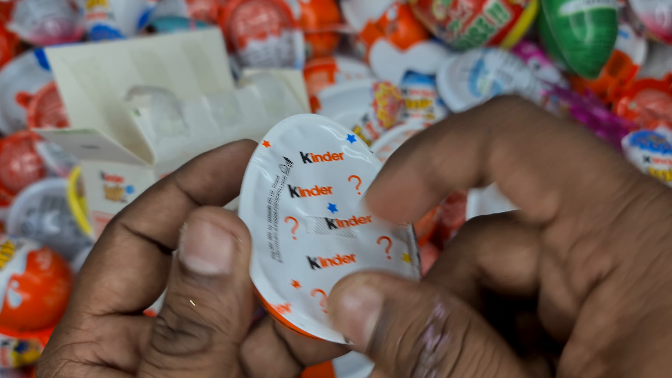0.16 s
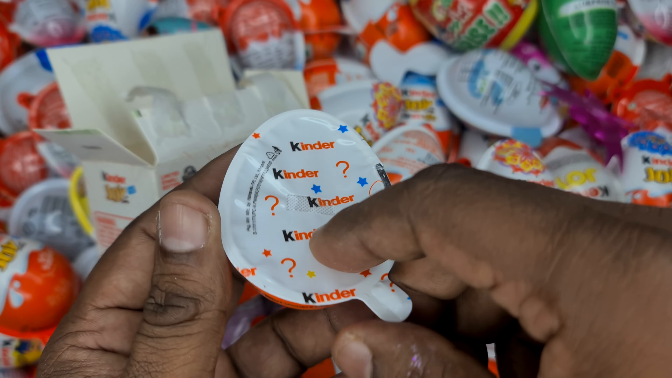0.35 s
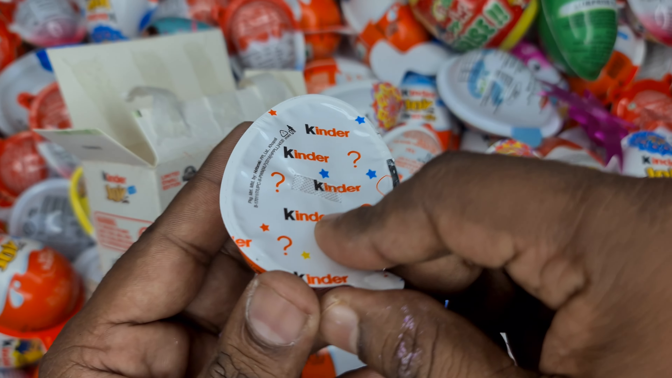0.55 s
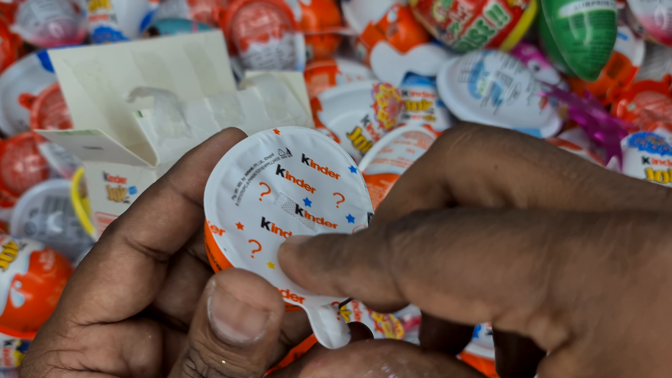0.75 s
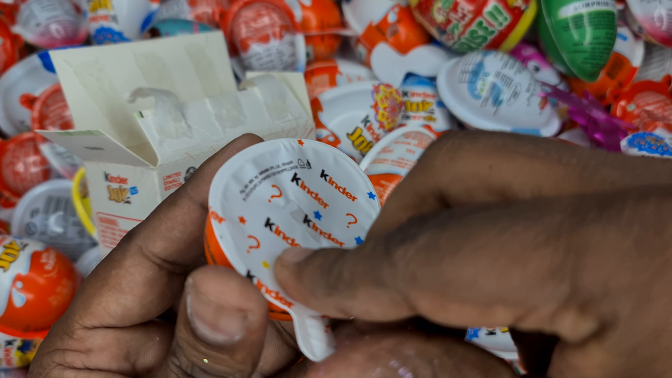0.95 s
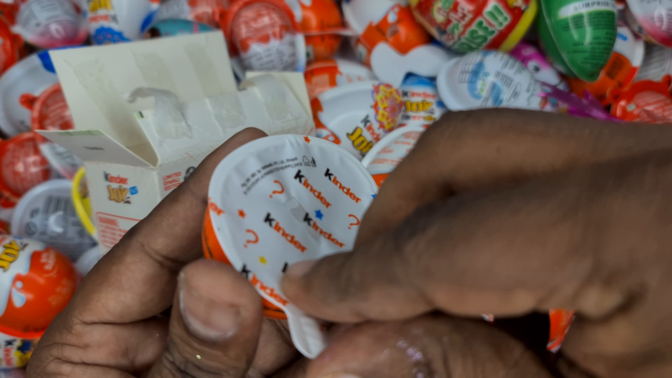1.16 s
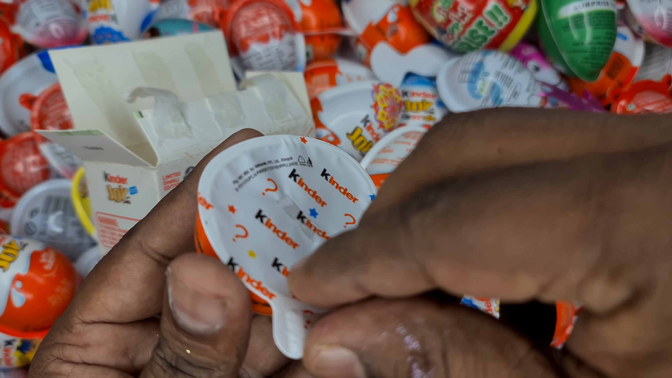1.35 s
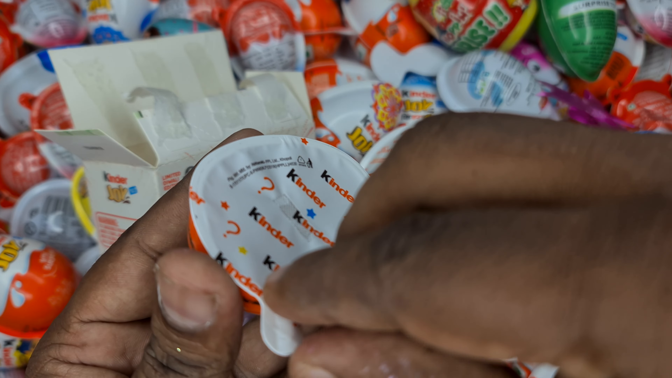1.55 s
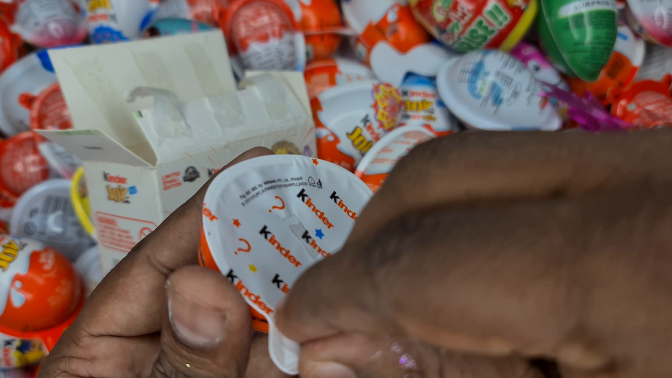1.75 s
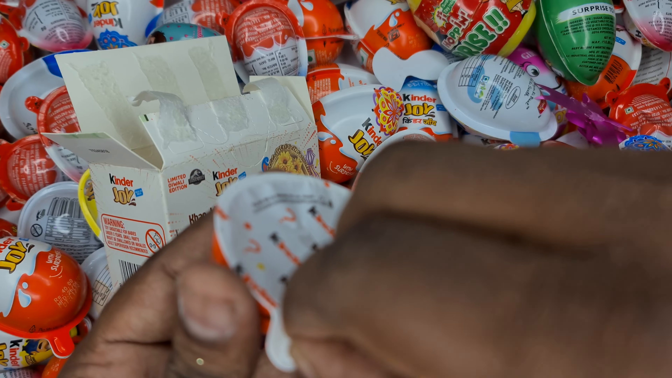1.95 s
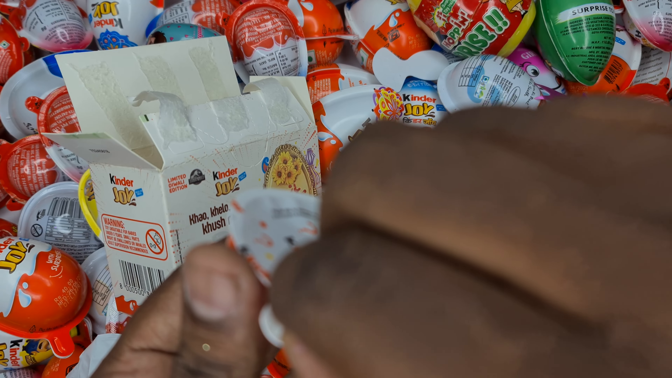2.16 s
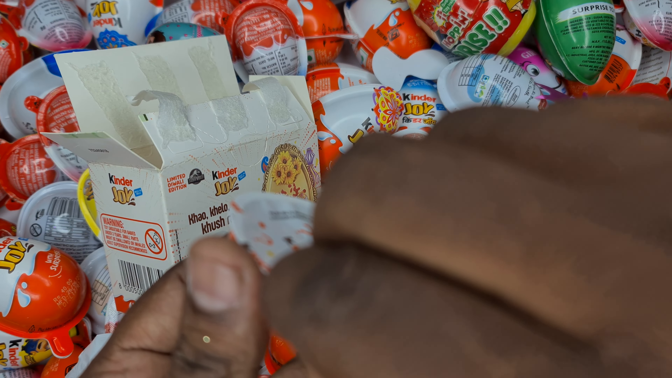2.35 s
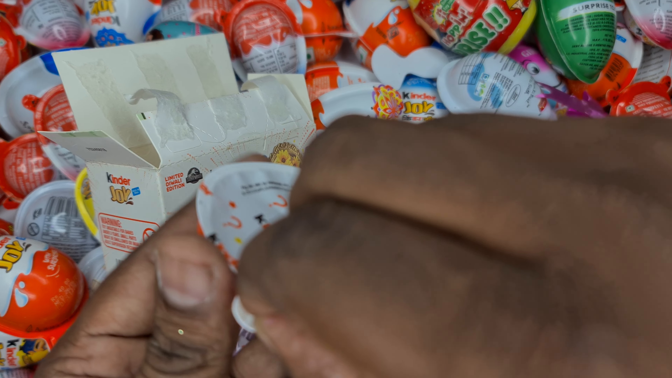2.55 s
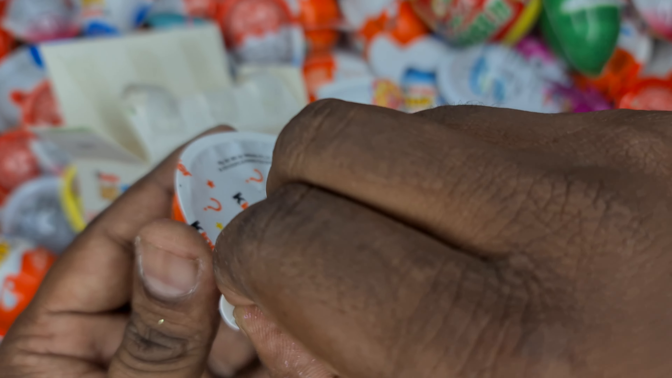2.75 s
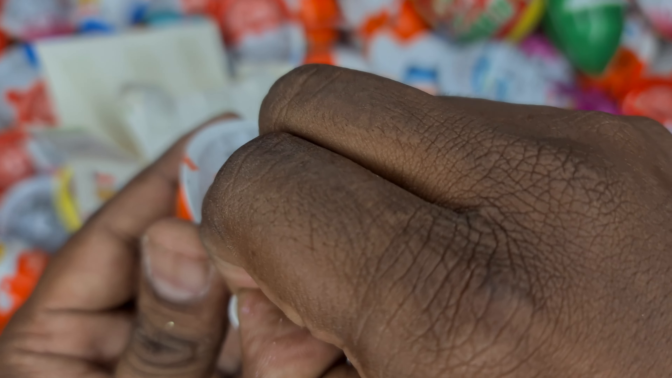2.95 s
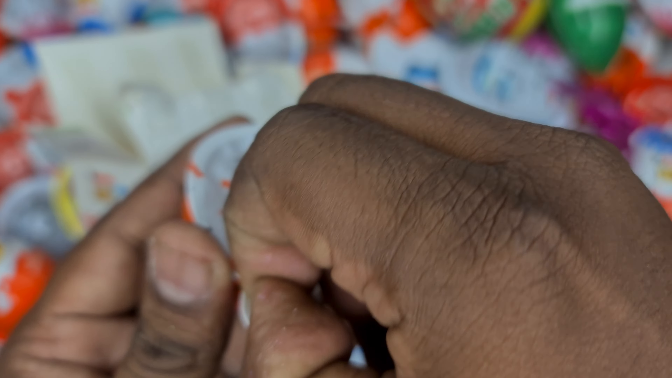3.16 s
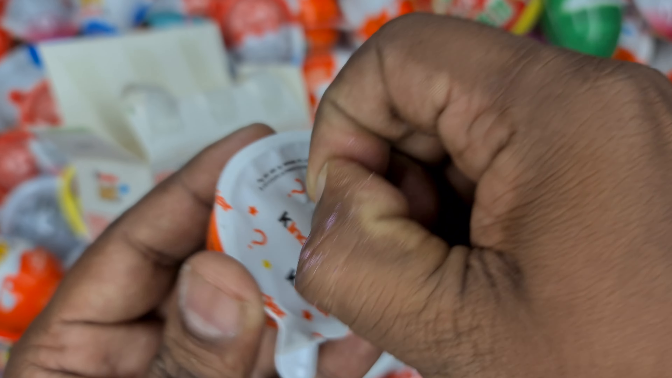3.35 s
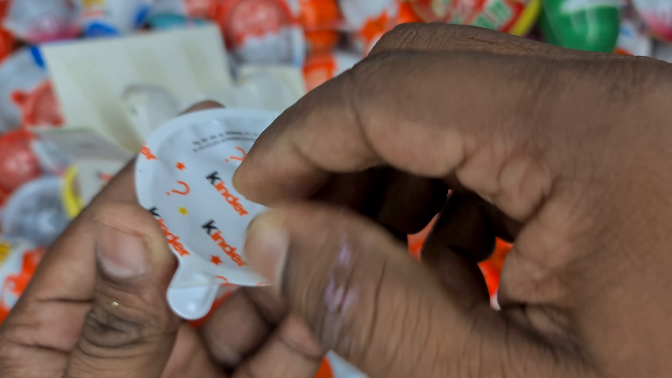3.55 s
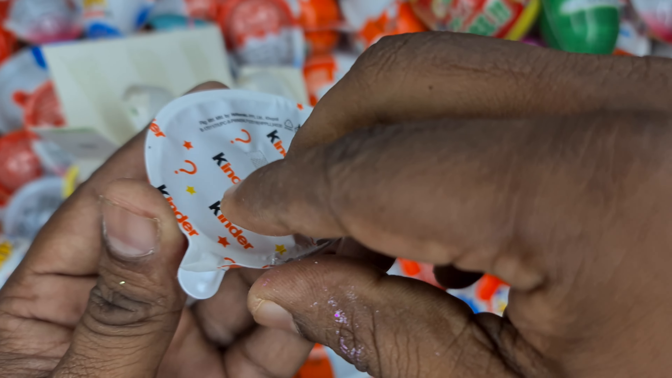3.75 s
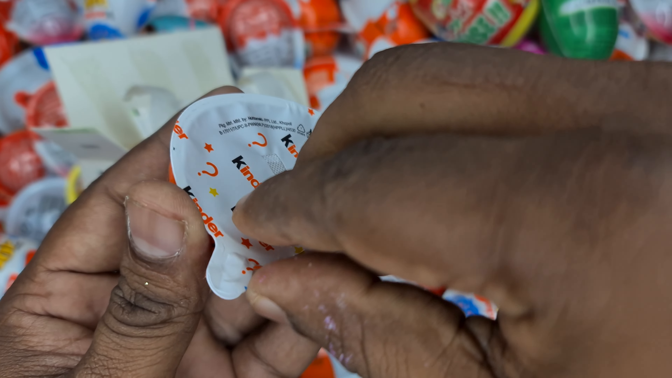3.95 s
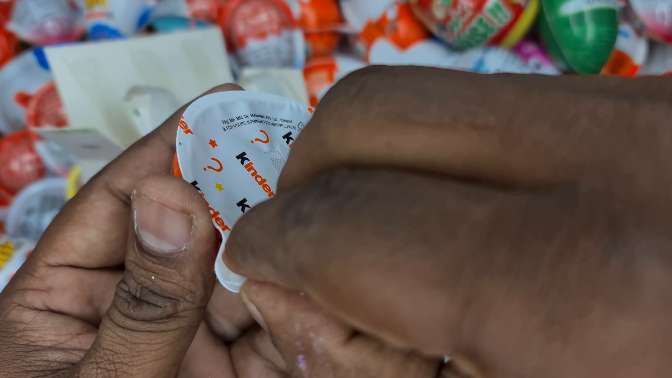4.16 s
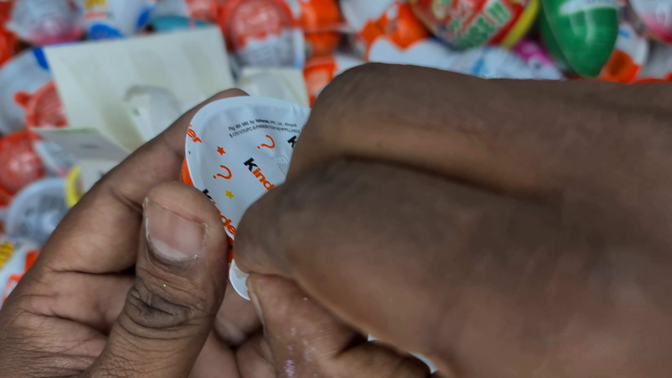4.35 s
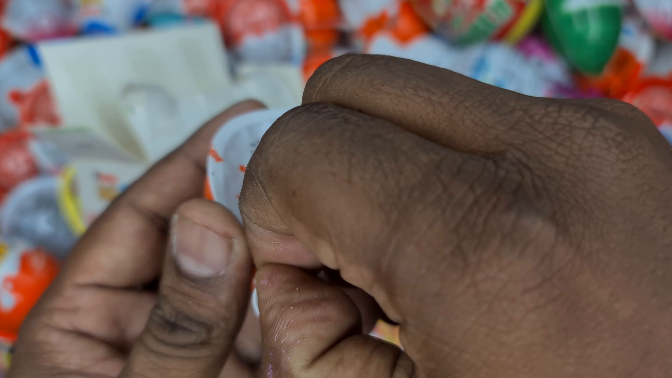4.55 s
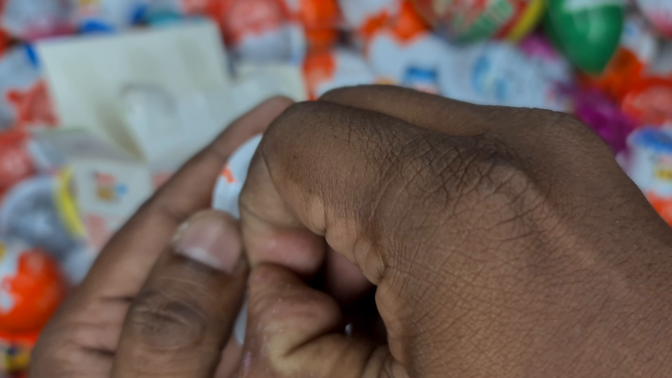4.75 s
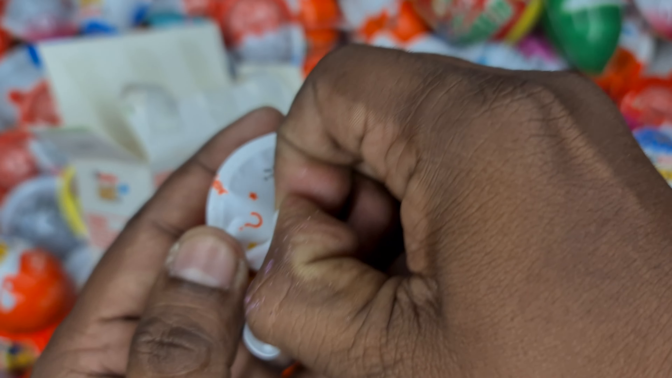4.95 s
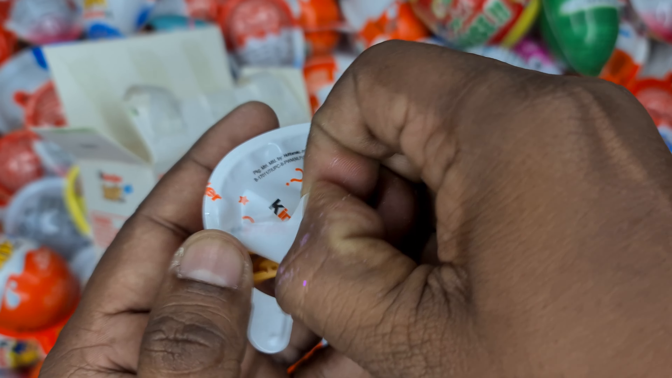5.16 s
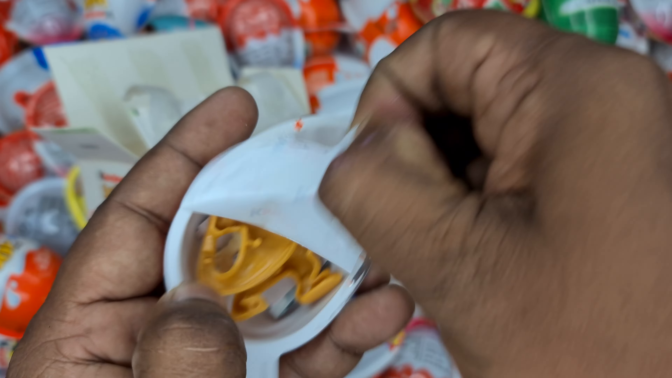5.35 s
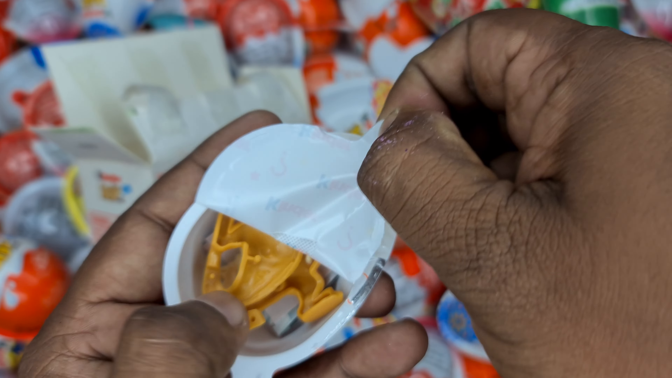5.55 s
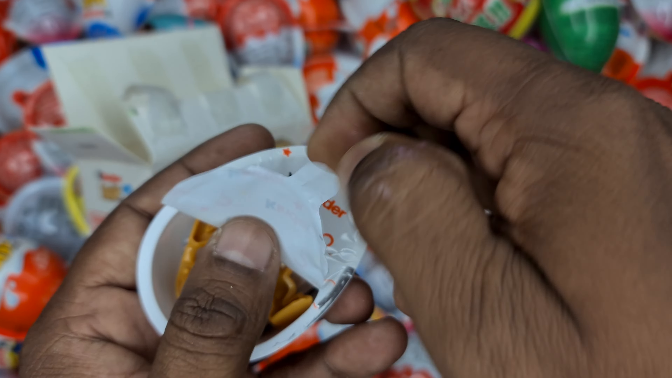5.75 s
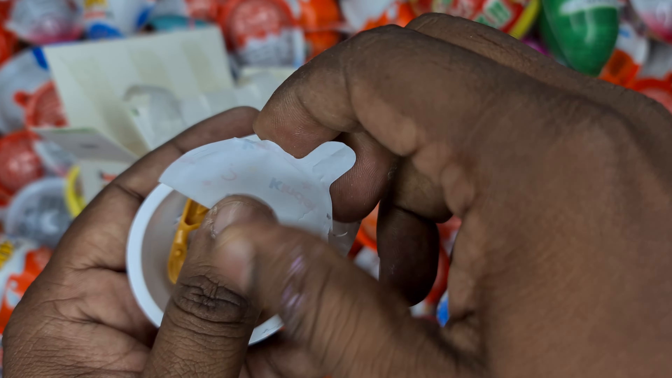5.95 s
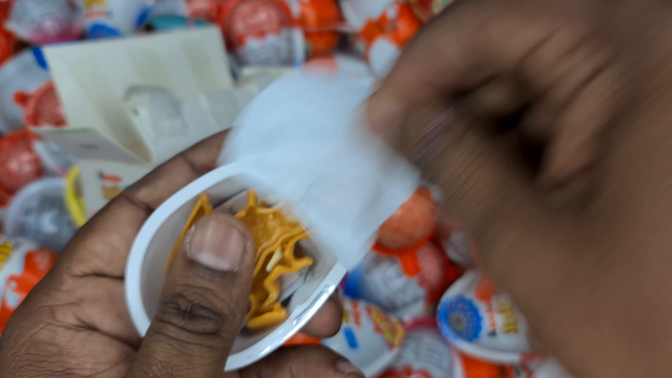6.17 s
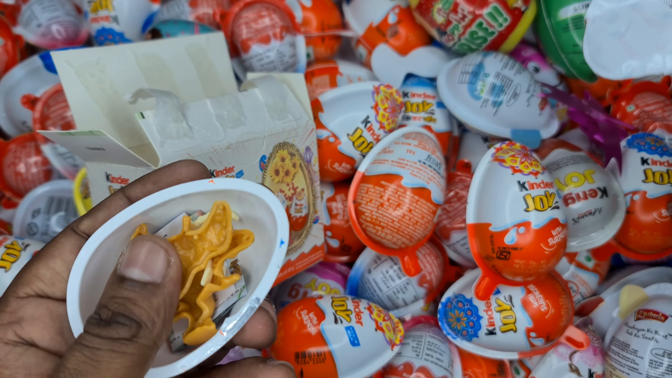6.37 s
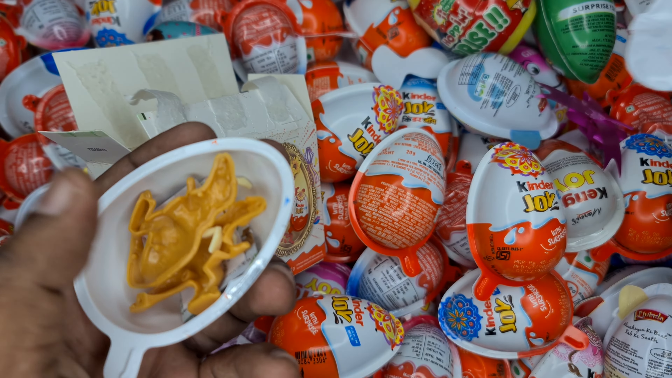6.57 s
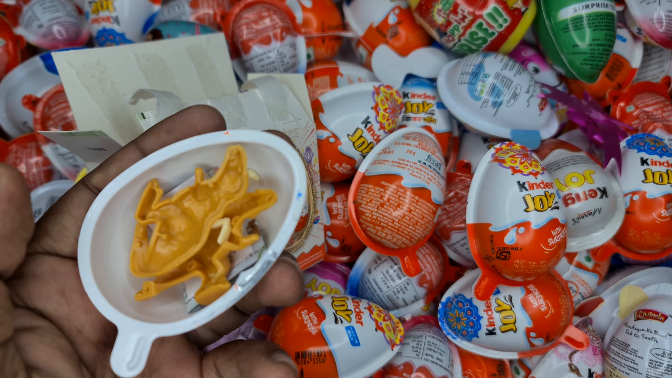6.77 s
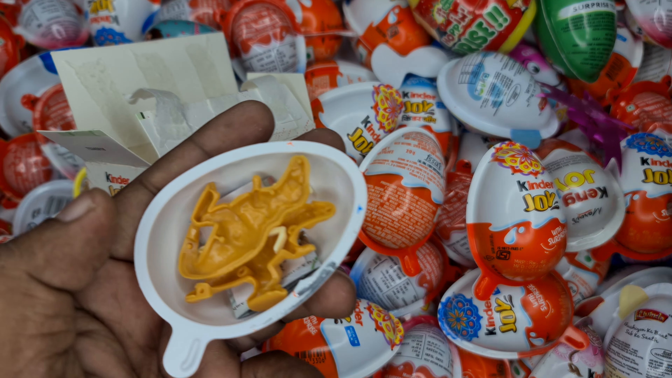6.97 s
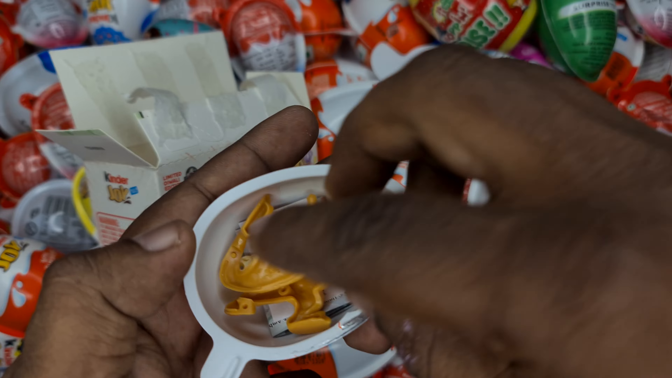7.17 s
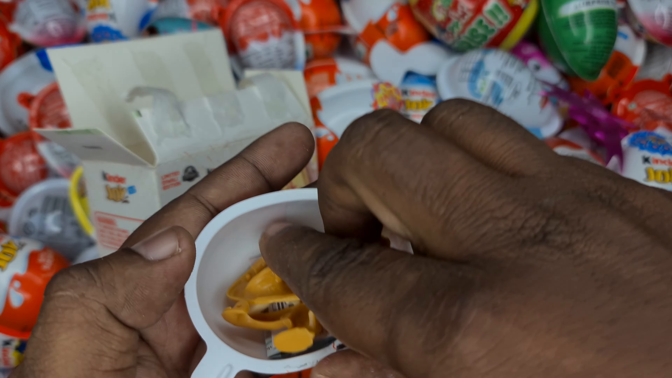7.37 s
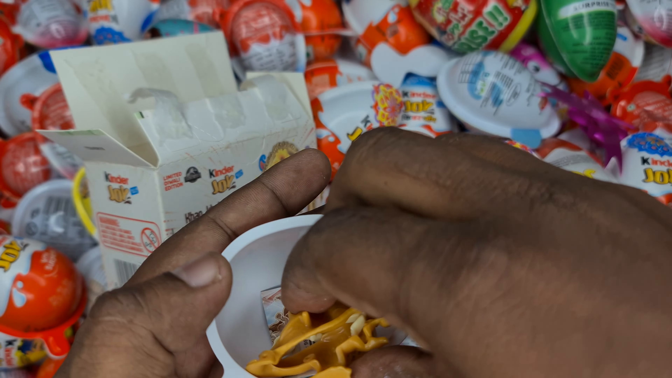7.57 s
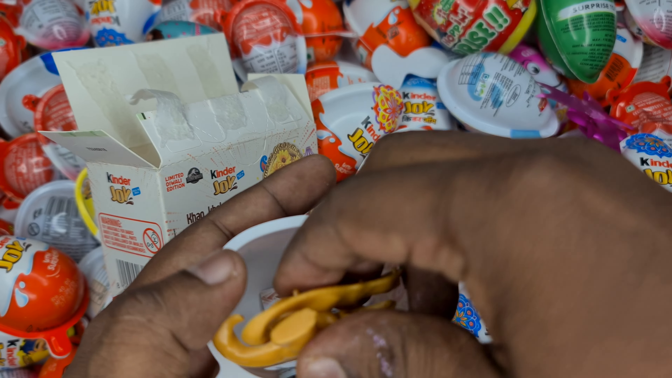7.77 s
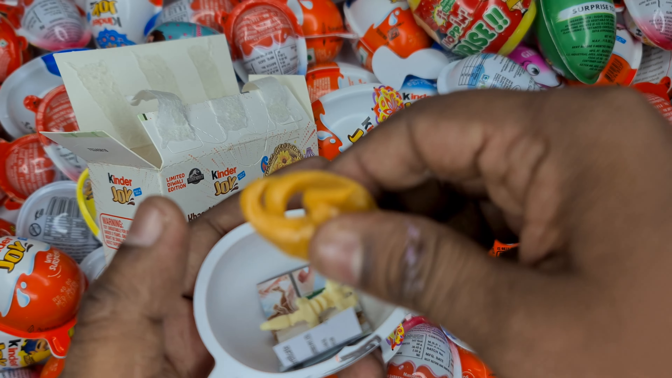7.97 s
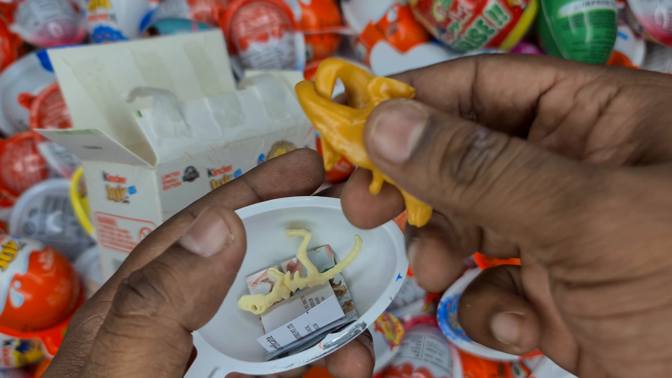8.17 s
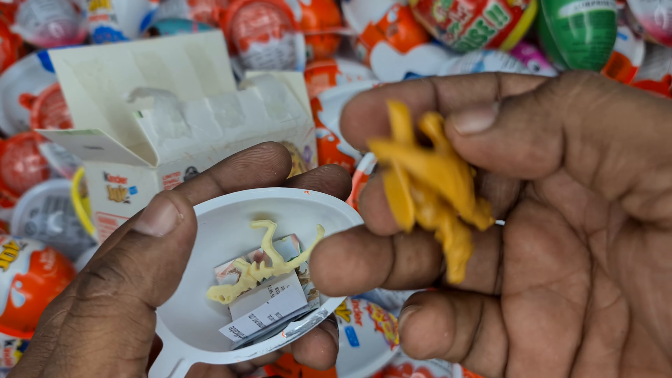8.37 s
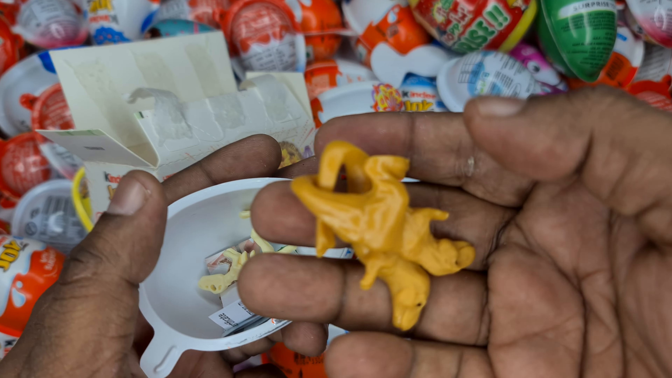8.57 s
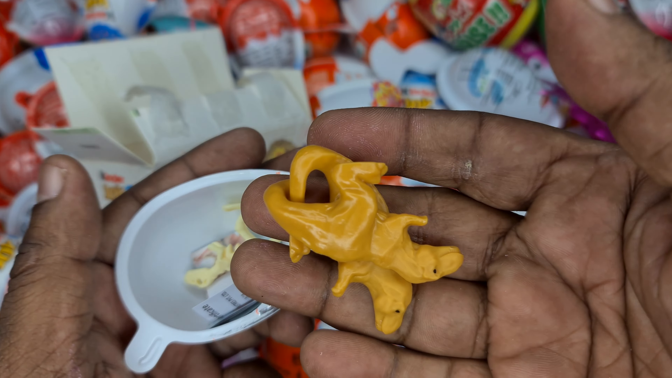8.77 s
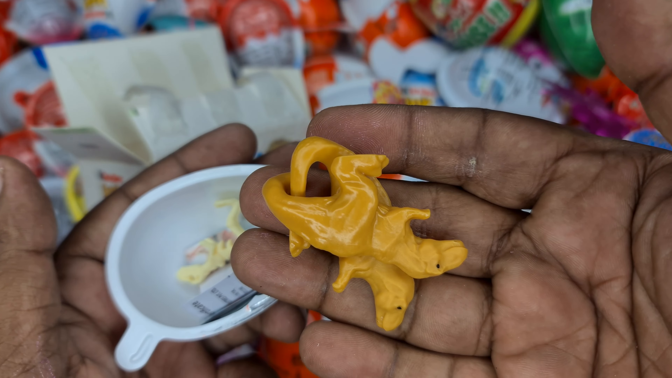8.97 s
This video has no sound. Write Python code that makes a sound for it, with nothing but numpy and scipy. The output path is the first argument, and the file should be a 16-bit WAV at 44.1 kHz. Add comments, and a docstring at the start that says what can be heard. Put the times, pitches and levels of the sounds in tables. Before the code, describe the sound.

A small, quiet room with soft air noise and a low, slowly wavering hum, heard close through two spaced microphones. At 0.05 to 0.25 s a few hollow foil pops sound as fingers press the capsule lid, then faint rustles and ticks, with isolated pops near 1.15, 2.3 and 2.6 s. A strong drum-like pop comes at 3.0 s, and a crackling cluster at 3.3 s. Around 4.0 and 4.45 s there are barely audible skin squeaks. From 4.75 s the seal begins to tear: bright snaps until 5.25 s, then a dense loud burst at 5.35 to 5.45 s. Lighter crackles follow to 5.8 s. The final rip at 6.15 to 6.27 s is sharp, with a dull knock and brief reverberation. Afterwards it is mostly quiet; from 7.2 to 8.2 s a plastic toy rustles and clicks softly against the shell, then hum remains until about 9 s.

```python
"""A small room with a low hum: fingers press and pick at the foil seal of a small plastic capsule,
peel it off in jerks and lift a plastic toy out. Each foil buckle pops at the pitch of the drum it forms
with the shell, rings the foil's modes and cracks in the treble; skin rustles and squeaks as shaped noise.
The room answers with decaying noise; two spaced microphones."""
import sys
import numpy as np
from scipy import signal
from scipy.fft import rfft, irfft, next_fast_len
from scipy.io import wavfile

SR = 44100
rng = np.random.default_rng(int(sys.argv[2]) if len(sys.argv) > 2 else 0)


def master(y):
    """Save y as 16-bit WAV."""
    cut = np.clip(np.atleast_2d(y).T, -1, 1)
    pcm = np.round(cut * 32767)  # scale
    wavfile.write(sys.argv[1], SR, pcm.astype(np.int16))


def natural_amplitude(level_db):
    """Convert a level in decibels to a linear amplitude factor, elementwise."""
    exponent = np.asarray(level_db, float) / 20
    return 10 ** exponent


N = 397782
RIGHT_LAG_S = 0.00022   # the foil edge is nearer the left microphone


def rms_one(x):
    """Scales to rms 1 over all channels."""
    return x / np.sqrt(np.mean(x ** 2) + 1e-20)


def at_hz(points, hz):
    """Reads a (hz, value) curve on a log frequency axis."""
    point_hz, value = np.array(points).T
    return np.interp(np.log(np.maximum(hz, 1)), np.log(point_hz), value)


def coloured(x, spectrum):
    """Filters noise by a curve in dB over Hz."""
    size = next_fast_len(x.shape[-1])
    hz = np.arange(size // 2 + 1) * SR / size
    shaped = rfft(x, size) * natural_amplitude(at_hz(spectrum, hz))
    return irfft(shaped, size)[..., :x.shape[-1]]


def resonance(x, hz, width_hz):
    """Two-pole band-pass, gain about 1 on top."""
    r = np.exp(-np.pi * width_hz / SR)
    b = [(1 - r * r) / 2, 0, (r * r - 1) / 2]
    a = [1, -2 * r * np.cos(2 * np.pi * hz / SR), r * r]
    return signal.lfilter(b, a, x)


def narrow(x, hz, width_hz):
    """Two equal resonances in series."""
    return resonance(resonance(x, hz, width_hz), hz, width_hz)


def bandpass(x, edges_hz):
    """Butterworth band-pass between two edges."""
    return signal.sosfilt(signal.butter(2, edges_hz, "band", fs=SR, output="sos"), x)


def highpass(x, hz):
    """Butterworth high-pass."""
    return signal.sosfilt(signal.butter(2, hz, "high", fs=SR, output="sos"), x)


def drift(rate_hz):
    """Slow random curve, standard deviation about 1."""
    knots = rng.standard_normal(400)
    return np.interp(np.arange(N) / SR * rate_hz, np.arange(400), knots) * np.sqrt(3 / 2)


def late(x):
    """Delay at the right microphone."""
    return np.roll(x, round(RIGHT_LAG_S * SR))


def placed(times_s, shapes):
    """Adds one short waveform at each time."""
    out = np.zeros(N + shapes.shape[1])
    for s, shape in zip(times_s, shapes):
        at = max(round(s * SR), 0)
        out[at:at + len(shape)] += shape
    return out[:N]


def rise_and_die(t, rise_s, t60_s):
    """Envelope with a soft rise and exponential decay; top 1."""
    shape = (1 - np.exp(-t / rise_s)) ** 2 * natural_amplitude(-60 * t / t60_s)
    return shape / shape.max(axis=-1, keepdims=True)


# room noise and microphone hiss, relative spectrum: pitch_hz, density_db_per_hz
AIR = [(15, -47), (25, -25), (59, -8.5), (123, -13.5), (212, -14.5), (335, -16.5), (384, -11.5),
       (545, -21.5), (734, -20), (1740, -31.5), (2300, -34), (4200, -40.5), (5400, -48), (7600, -57.5),
       (13500, -49.5), (16000, -47)]
# left-right likeness of diffuse sound: pitch_hz, likeness (0 to 1)
LIKENESS = [(60, 1), (240, 0.94), (950, 0.029), (3770, 0.01), (15000, 0.01)]
# wavering machine tones: pitch_hz, width_hz (each of two filters), level_db
HUM = [(119, 6.3, -66.5), (261, 11, -75.5), (392.2, 17, -67.5), (1770, 20, -80.5), (3500, 40, -92),
       (4130, 40, -92.5), (8450, 200, -97)]


def background():
    """Room noise, alike at both microphones only in the bass, plus narrow noise bands as wavering tones."""
    mid, side = coloured(rng.standard_normal((2, N)), AIR)
    hz, alike = np.array(LIKENESS).T
    alike = np.clip(alike, 0, 0.98)
    mid = coloured(mid, list(zip(hz, 10 * np.log10(1 + alike))))
    side = coloured(side, list(zip(hz, 10 * np.log10(1 - alike))))
    air = natural_amplitude(-59.5) * rms_one(np.array([mid + side, mid - side]))
    for tone_hz, width_hz, level_db in HUM:
        shared = rng.standard_normal(N)
        noise = shared + 0.68 * rng.standard_normal((2, N))
        air += natural_amplitude(level_db) * rms_one(narrow(noise, tone_hz, width_hz))
    return air


# chance louder moments of a narrow low noise band, heard as a wavering hum, added to its floor:
# centre_s, level_db
LOUDER_MOMENTS = [(0.35, -59), (0.9, -56), (1.53, -58.5), (1.95, -61.5), (2.3, -62.5), (3.15, -59.5),
                  (3.45, -56.5), (3.9, -61.5), (4.22, -51.5), (4.7, -58), (5.25, -60), (5.55, -56.5),
                  (6.25, -54), (6.58, -57), (7.03, -59.5), (7.55, -58), (7.96, -60.5), (8.4, -62),
                  (8.92, -58)]


def low_hum(pitch_hz=65.7, floor_db=-72, moment_sigma_s=0.11, apart_rad=0.45):
    """Narrow low band as a sine of randomly wavering pitch and level, slightly apart in phase between the
    sides."""
    t = np.arange(N) / SR
    level = natural_amplitude(floor_db)
    for centre_s, level_db in LOUDER_MOMENTS:
        level = level + natural_amplitude(level_db) * np.exp(-0.5 * ((t - centre_s) / moment_sigma_s) ** 2)
    phase = 2 * np.pi * np.cumsum(pitch_hz + 2.0 * drift(8.0)) / SR + [[0], [apart_rad]]
    return np.sqrt(2) * level * natural_amplitude(2.2 * drift(6.0)) * np.sin(phase)


# reverberation time: pitch_hz, t60_s
ROOM_T60 = [(300, 0.34), (1000, 0.28), (2500, 0.37), (6000, .33), (14000, 0.2)]
# reverberation start level, relative: pitch_hz, level_db
ROOM_COLOUR = [(200, -6), (600, -4.5), (1500, -5.5), (4000, 5), (9000, 0), (15000, -3)]


def room(x, level_db=-11.5, gap_s=0.0029):
    """Convolves with noise that dies band by band after a short gap."""
    t = np.arange(int(0.5 * SR)) / SR
    edges_hz = 150 * 2 ** np.arange(0, 7.1, 0.5)
    tail = 0
    for low_hz, high_hz in zip(edges_hz, edges_hz[1:]):
        hz = np.sqrt(low_hz * high_hz)
        alike = np.clip(at_hz(LIKENESS, hz), 0, 1)   # long waves reach both microphones alike
        mid, side = rng.standard_normal((2, len(t)))
        white = np.sqrt(1 + alike) * mid + np.sqrt(1 - alike) * side * [[1], [-1]]
        band = bandpass(white, [low_hz, high_hz]) / np.sqrt(2)
        decay_db = at_hz(ROOM_COLOUR, hz) - 60 * t / at_hz(ROOM_T60, hz)
        tail = tail + band * natural_amplitude(decay_db)
    tail = tail * np.clip(t / gap_s - 1, 0, 1)   # silent for one gap, full after two
    tail = tail / np.sqrt(np.sum(tail ** 2) / 2)
    return natural_amplitude(level_db) * signal.fftconvolve(x, tail, axes=1)[:, :N]


def hump(t, start_s, length_s, edge_db=7.0, flatness=3.1):
    """Touch level in dB: rises, holds and fades; edge_db down at both ends."""
    return -edge_db * np.abs(2 * (t - start_s) / length_s - 1) ** flatness


# fingers sliding and foil creeping: start_s, length_s, rustle_db, shell_db
STROKES = [(0.105, 0.14, -61, -67), (0.15, .9, -73, -72.5), (0.425, 0.042, -60, -57.5),
           (0.505, .05, -69.5, -67), (0.665, 0.031, -61, -59), (0.854, 0.039, -54, -58),
           (0.935, .05, -61.5, -60), (1.02, .055, -59.5, -56.5), (2.335, 0.0087, -58, -75),
           (2.638, .02, -60, -77), (2.855, .02, -72, -70), (3.268, 0.12, -46.5, -50),
           (3.995, 0.043, -70, -56.5), (4.445, 0.033, -65, -53), (4.6, 0.16, -69, -64),
           (4.815, .075, -50, -75), (4.957, 0.032, -52, -37), (5.022, 0.1, -46, -74),
           (5.142, 0.067, -48, -74), (5.384, 0.017, -27, -21), (5.64, 0.059, -70, -54),
           (5.732, .07, -54.5, -55.5), (6.065, .025, -69, -70), (6.2, 0.072, -35, -25.5),
           (6.36, .12, -58, -63), (6.53, .03, -57, -72), (6.635, .025, -68, -76), (6.99, 0.028, -62, -68),
           (7.215, .015, -69, -73), (7.335, 0.08, -49, -52.5), (7.485, 0.066, -51, -55),
           (7.57, 0.067, -59, -59), (7.68, 0.25, -58, -63), (8.158, .1, -70, -70), (8.276, .04, -58, -71)]


def strokes(hold_rustle_db=-86, hold_shell_db=-73.5):
    """Rustle and shell gains: one hump per stroke over the level of a capsule merely held."""
    start_s, length_s, rustle_db, shell_db = [c[:, None] for c in np.transpose(STROKES)]
    coarse_s = np.arange(0, N / SR, 0.001)
    shape_db = hump(coarse_s, start_s, length_s)
    gains = []
    for level_db, hold_db in ((rustle_db, hold_rustle_db), (shell_db, hold_shell_db)):
        gain = natural_amplitude(hold_db) + natural_amplitude(level_db + shape_db).sum(axis=0)
        gains.append(np.interp(np.arange(N) / SR, coarse_s, gain))
    return gains


# skin on foil, relative spectrum: pitch_hz, density_db_per_hz
RUSTLE = [(1180, -31.5), (2000, -2), (4190, -10.5), (5030, -2.5), (5540, -8.5), (6420, -11.5), (14200, -22),
          (16000, -31.5)]
# toy against shell and paper, relative spectrum: pitch_hz, density_db_per_hz
TOY_RUSTLE = [(1060, -52), (1800, -22), (2120, -12), (2670, 1), (3120, -18), (4790, -8.5), (7420, -13),
              (11500, -16), (16000, -29)]
# shell resonances, relative level: pitch_hz, width_hz, level_db
SHELL = [(780, 140, -3), (1140, 170, -1), (1550, 260, 1), (2650, 100, -7.5)]


def rub(grains_per_s=1500.0, spread_db=4.5, flutter_db=2.5, toy_from_s=6.8):
    """Dense tiny slips of uneven size, fluttering in level; the shell answers in its resonances."""
    rustle_gain, shell_gain = strokes()
    t = np.arange(N) / SR
    sizes = natural_amplitude(spread_db * np.minimum(rng.exponential(1, N), 5)) * rng.choice([-1, 1], N)
    grains = rms_one(sizes * (rng.random(N) < grains_per_s / SR))
    slips = 0.8 * np.array([grains, late(grains)]) + 0.6 * rng.standard_normal((2, N))
    slips *= natural_amplitude(flutter_db * drift(40.0))
    shell = 0
    for k, (hz, width_hz, level_db) in enumerate(SHELL):
        shell = shell + (-1) ** k * natural_amplitude(level_db) * resonance(slips, hz, width_hz)
    shell = shell_gain * natural_amplitude([[-1.5], [1.5]]) * rms_one(shell)
    on_foil, on_toy = rms_one(coloured(slips, RUSTLE)), rms_one(coloured(slips, TOY_RUSTLE))
    return rustle_gain * np.where(t < toy_from_s, on_foil, on_toy) + shell


# fingertip squeaks on foil: start_s, length_s, slip_rate_hz, level_db
SQUEAKS = [(3.991, 0.054, 1654, -57), (4.45, .03, 1703, -64)]
# squeak overtones: multiple of slip rate, level_db
SQUEAK_OVERTONES = [(1, 0), (2.1, -5), (3.05, -9), (4, -11)]


def squeaks(spread=0.08):
    """Skin sticks and slips so unevenly that each overtone is a breathy band; spread = width / pitch."""
    t, out = np.arange(N) / SR, 0
    for start_s, length_s, slip_hz, level_db in SQUEAKS:
        noise = rng.standard_normal(N)
        bands = 0
        for multiple, overtone_db in SQUEAK_OVERTONES:
            hz = multiple * slip_hz
            bands = bands + natural_amplitude(overtone_db) * rms_one(narrow(noise, hz, spread * hz))
        out = out + bands * natural_amplitude(level_db + hump(t, start_s, length_s))
    return np.array([out, late(out)])


# hand jolts the shell as the seal tears free: start_s, level_db, pitch_hz
JOLTS = [(5.009, -22, 400), (5.385, -23, 331.7), (6.246, -25.5, 400), (6.2516, -11.5, 293),
         (6.253, -21, 110.2)]


def jolts():
    """Dull push: a low sine that dies in a few cycles."""
    start_s, level_db, hz = [c[:, None] for c in np.transpose(JOLTS)]
    t = np.arange(4000) / SR
    push = natural_amplitude(level_db) * np.sin(2 * np.pi * hz * t) * rise_and_die(t, 0.00037, 6.7 / hz)
    push = highpass(push, 70)   # a small shell sends out no deep bass
    return placed(start_s[:, 0] - 0.001, push) * natural_amplitude([[1.5], [-1.5]])


def ticks(ticks_per_s=30, most=8, over_rub_db=3.0, spread_db=3.0):
    """Small buckles at random inside the strokes, at most 8 each; rows as in SNAPS."""
    rows = []
    for start_s, length_s, rustle_db, shell_db in STROKES:
        draw = rng.random((most, 6))
        uneven_db = over_rub_db + spread_db * (4 * draw[:, 3:] - 2)
        for (chance, place, pitch), (pop, ring, crack) in zip(draw[:, :3], uneven_db):
            if chance < ticks_per_s * length_s / most:
                levels_db = (shell_db + pop, rustle_db + ring, rustle_db + crack - 4.0)
                rows.append((start_s + place * length_s, 600 * 3.2 ** pitch, *levels_db))
    return rows


def drum_pop(t, hz, luck, t60_cycles=10.5):
    """Drum of foil and shell: a dying sine; two neighbouring modes beat with it."""
    pop = np.sin(2 * np.pi * hz * t) * rise_and_die(t, 0.0013, t60_cycles / hz)
    for k, (ratio, side_db) in enumerate([(0.66, -12.5), (1.3, -9.5)]):
        side_hz = ratio * hz * (1 + 0.055 * luck[:, k:k + 1])
        side_gain = natural_amplitude(side_db + 4.3 * luck[:, k + 2:k + 3])
        pop += side_gain * np.sin(2 * np.pi * side_hz * t) * rise_and_die(t, 0.0014, 12.0 / side_hz)
    return pop


# foil modes, relative level: pitch_hz, level_db, t60_s
FOIL = [(2270, -3, 0.0059), (2656, -0.5, .008), (3240, -1.5, 0.0055), (3690, -2, 0.0041), (4280, 0, 0.0032)]


def foil_ring(t, sharpness_db, luck, sign, reach_db=24.0):
    """Foil modes: where the foil buckles decides which ring; tension shifts them a little."""
    octaves = 0.006 * sharpness_db + 0.05 * luck[:, -1:]   # sharper cracks ring higher
    centre_hz = np.clip(2950 * 2 ** octaves, FOIL[0][0], FOIL[-1][0])
    facing = rng.standard_normal((len(luck), len(FOIL)))   # each mode beams unevenly
    ring = 0
    for k, (mode_hz, level_db, t60_s) in enumerate(FOIL):
        off_db = reach_db * np.abs(np.log(mode_hz / centre_hz))
        gain = natural_amplitude(level_db - off_db + 2.3 * facing[:, k:k + 1]) * rise_and_die(t, 0.00017, t60_s)
        hz = mode_hz * (1 + 0.035 * luck[:, 4 + k:5 + k])
        ring = ring + gain * np.sin(2 * np.pi * hz * t + sign * 0.61 * k)
    return ring


# foil buckles, glue letting go, toy on shell, relative levels: start_s, drum_hz, pop_db, ring_db, crack_db
SNAPS = [(0.0462, 1630, -22, -54, -63), (0.0726, 1330, -11, -21, -27), (0.2434, 1350, -24.5, -53, -58),
         (0.2478, 1430, -17, -41, -59.5), (0.5391, 1530, -50, -50.5, -59), (0.6008, 795, -59, -54, -54),
         (0.6296, 640, -52, -59, -56), (0.635, 1520, -44.5, -49.5, -55), (0.813, 1090, -45, -52, -54),
         (0.8967, 510, -54.5, -41, -58), (1.1466, 1076, -24.5, -49.5, -58.5), (1.2465, 1160, -40, -45, -32),
         (1.259, 1240, -38, -38, -45.5), (1.2677, 1140, -41, -42, -24.5), (1.7353, 1600, -48, -56, -53),
         (1.8215, 1230, -42.5, -51.5, -54.5), (1.8447, 1520, -44.5, -51, -59),
         (2.33, 1420, -26.5, -39, -48), (2.6331, 1475, -23.5, -29, -37), (2.8047, 1030, -49, -70, -77.5),
         (3.019, 1170, -6, -25.5, -43.5), (3.1735, 817, -41, -64, -79), (3.2603, 1187, -14, -15, -24),
         (3.2864, 1020, -20.5, -30, -23.5), (3.2984, 1306, -29, -24, -40),
         (3.3049, 1380, -30, -40.5, -40.5), (3.3276, 1100, -32, -46.5, -50.5), (3.391, 1223, -48, -45, -33),
         (3.543, 1000, -59, -55, -64), (3.7205, 780, -53.5, -54, -59), (3.8167, 1330, -48, -58, -68.5),
         (3.999, 1580, -45.5, -55, -65), (4.1644, 950, -48, -51, -53.5), (4.1932, 1700, -42, -39.5, -32.5),
         (4.4535, 1403, -47, -38, -50.5), (4.553, 1400, -58, -48, -59.5), (4.7454, 849, -37, -67, -69),
         (4.7584, 1640, -20.5, -52, -58), (4.7776, 923, -16, -29.5, -44), (4.8033, 1165, -9.5, -19, -27),
         (4.8087, 1820, -13, -22.5, -20.5), (4.873, 1594, -24, -37, -45), (4.9169, 1888, -47.5, -52, -30.5),
         (4.9406, 1610, -23, -13.5, -13), (4.9427, 1710, -19.5, -13, -10), (4.951, 947, -18.5, -15.5, -7),
         (4.9549, 1550, -11, -20.5, -19), (5.0095, 1270, -13, -18.5, -10), (5.119, 1138, -38.5, -53, -43),
         (5.1405, 1280, -5.5, -15.5, -19), (5.2188, 1440, -25, -34.5, -36.5), (5.2238, 1484, -7, -19, -15),
         (5.2495, 1611, -26.5, -31, -39), (5.2693, 1017, -27, -48, -49), (5.3583, 938, -36, -41, -51.5),
         (5.3786, 1160, -5, -11, -20), (5.3834, 960, -8, -10, -11), (5.3884, 1295, -6.5, -15, -21.5),
         (5.3939, 1510, -5.5, -16, -21.5), (5.3987, 1100, -12, -20, -23), (5.4055, 1100, -7.5, -13, -14),
         (5.4247, 1540, -5.5, -13.5, -12.5), (5.4347, 1370, -16.5, -29, -18), (5.6981, 1656, -36, -40, -54),
         (5.7155, 1595, -33, -41, -51), (5.7276, 1313, -22, -10.5, -29.5), (5.7672, 1243, -27, -46, -48.5),
         (5.7776, 1569, -22.5, -40, -39), (5.8221, 1690, -41.5, -52, -46), (5.9931, 1580, -47, -59, -76.5),
         (6.1052, 882, -40.5, -69.5, -73), (6.1593, 1900, -14.5, -22.5, -43),
         (6.1796, 1680, -34, -43, -38.5), (6.194, 1169, -16, -24.5, -34.5),
         (6.2017, 1013, -15.5, -6.5, -18.5), (6.2112, 1640, -6.5, -17.5, -10.5),
         (6.2152, 632, -14, -13, -20.5), (6.2175, 607, -12.5, -19, -21), (6.2314, 1920, -12.5, -10.5, -13),
         (6.241, 773, -13, -16, -25), (6.246, 1904, -6, -10, -12.5), (6.2539, 521.6, -12, -17, -7),
         (6.2646, 792, -13.5, -12.5, -18), (6.2706, 1242, -9.5, -10, -19), (6.521, 1850, -55, -40, -47.5),
         (6.994, 794, -45.5, -51.5, -60.5), (7.2131, 820, -56.5, -39.5, -45),
         (7.2166, 1370, -50, -43.5, -43), (7.3244, 780, -45, -39, -54), (7.3334, 1065, -31.5, -30.5, -31.5),
         (7.3829, 850, -44, -31, -34.5), (7.4114, 1230, -54, -37, -47.5), (7.454, 1505, -45, -29, -35.5),
         (7.5323, 1590, -41, -38.5, -43), (7.579, 780, -46.5, -35, -37), (7.92, 840, -44, -45, -44.5),
         (7.9427, 1920, -41.5, -43, -35), (8.0177, 820, -57, -54, -67.5), (8.1401, 1540, -31.5, -36, -44),
         (8.4563, 505, -58, -55.5, -48), (8.4644, 750, -60.5, -58, -54), (8.527, 900, -61.5, -61.5, -59.5)]


def snaps(crack_t60_s=0.011, crack_lean_db=2.0, pop_lean_db=-4.0, crack_alike=0.5, pop_lag_s=0.00023):
    """A buckle pops the drum, rings the foil's modes and throws a short hiss; left, right, away."""
    start_s, hz, pop_db, ring_db, crack_db = [c[:, None] for c in np.transpose(SNAPS + ticks())]
    start_s, t = start_s[:, 0] - 0.0006, np.arange(1200) / SR
    luck = rng.standard_normal((len(start_s), 10))
    pop = natural_amplitude(pop_db - 0.1) * drum_pop(t, hz, luck)
    sharpness_db = crack_db - ring_db
    top_db = np.clip(0.6 * sharpness_db - 5.5, -24, -5)   # blunt buckles lack the highest octave
    shared = rng.standard_normal((len(start_s), len(t)))
    sides = []
    for sign, drum_s, edge_s in ((1.0, 0, 0), (-0.85, pop_lag_s, RIGHT_LAG_S), (0.33, 0, 0)):
        ring = foil_ring(t, sharpness_db, luck, sign)
        own = rng.standard_normal(shared.shape)
        hiss = np.sqrt(crack_alike) * shared + np.sqrt(1 - crack_alike) * own
        hiss = hiss * rise_and_die(t, 0.00047, crack_t60_s)
        crack = bandpass(hiss, [4000, 8500]) - natural_amplitude(top_db) * highpass(hiss, 8500)
        bright = natural_amplitude(ring_db + 0.6) * ring + natural_amplitude(crack_db + 0.5) * crack
        bright *= natural_amplitude(sign * crack_lean_db / 2)   # the peeling edge faces left
        pop_side = pop * natural_amplitude(sign * pop_lean_db / 2)   # the open side of the shell faces right
        sides.append(placed(start_s + drum_s, pop_side) + placed(start_s + edge_s, bright))
    return np.array(sides)


def scene():
    """Capsule, its reverberation and the background, summed."""
    left, right, away = snaps()
    near = np.array([left, right]) + jolts() + rub() + squeaks()
    # the walls hear the capsule from three directions, each with its own colour
    walls = sum(room(x[None]) for x in (near[0], near[1], away)) / np.sqrt(3)
    left, right = background() + low_hum()
    return near + walls + np.array([left, late(right)])


def low_pass(x):
    """Removes everything above the highest recorded frequency."""
    return signal.sosfilt(signal.butter(12, 16470, fs=SR, output="sos"), x)


def record(dry):
    """The microphone rolls off above 15.3 kHz; peaks clip at full scale."""
    heard = signal.sosfilt(signal.butter(8, 15300, fs=SR, output="sos"), dry)
    mix = np.clip(heard, -1, 1)
    return low_pass(mix)


dry = scene()
out = record(dry)
master(out)
```